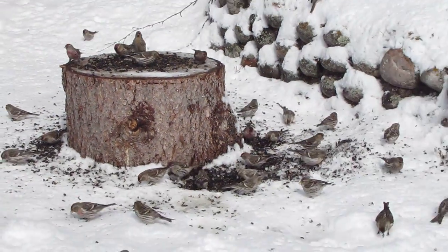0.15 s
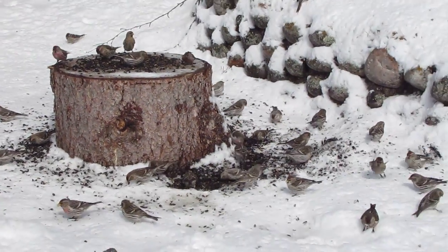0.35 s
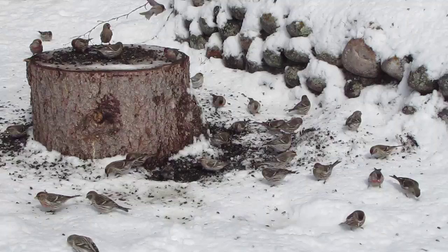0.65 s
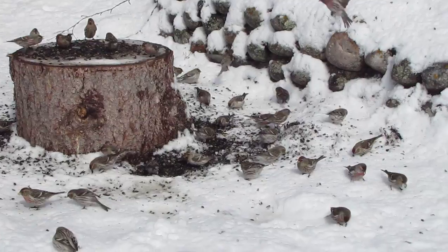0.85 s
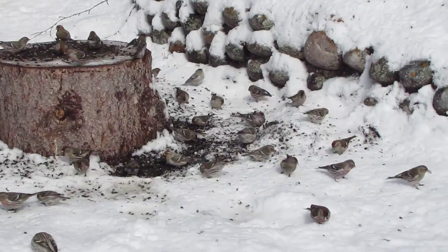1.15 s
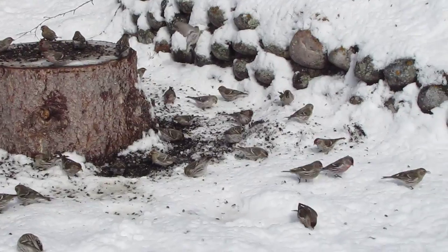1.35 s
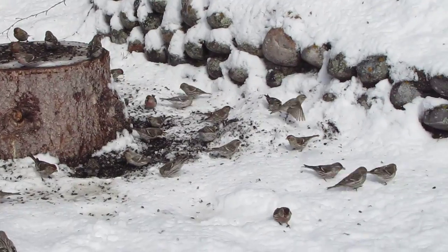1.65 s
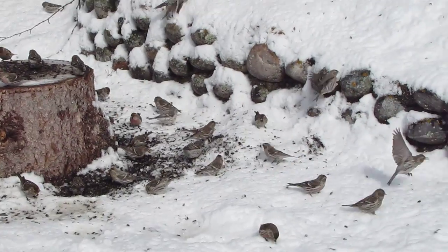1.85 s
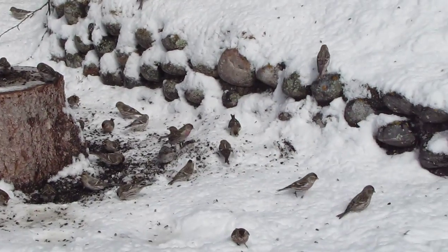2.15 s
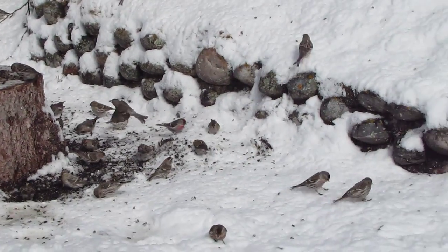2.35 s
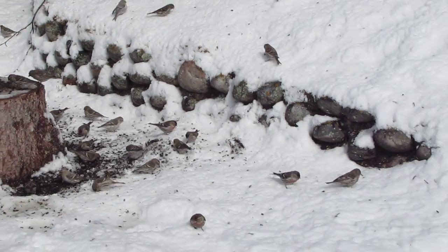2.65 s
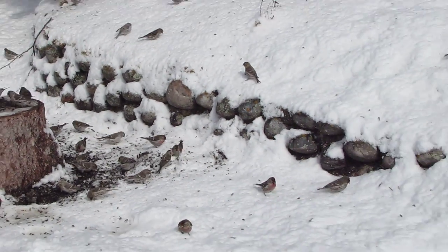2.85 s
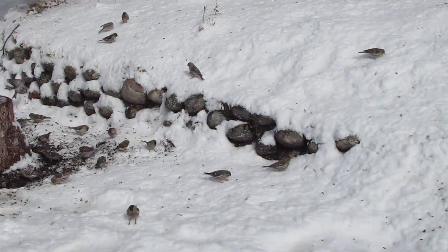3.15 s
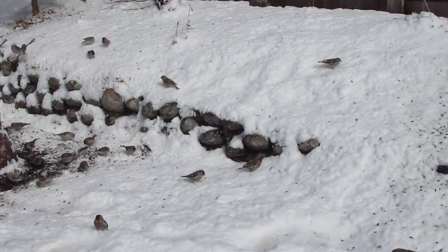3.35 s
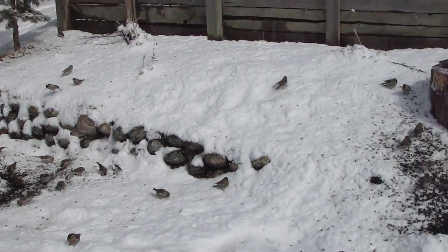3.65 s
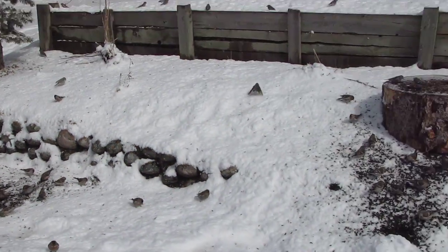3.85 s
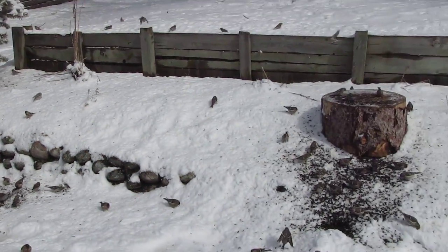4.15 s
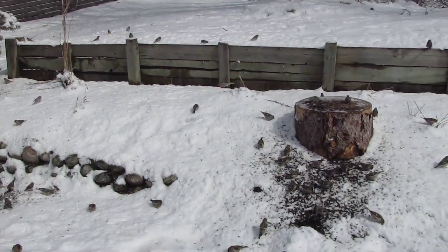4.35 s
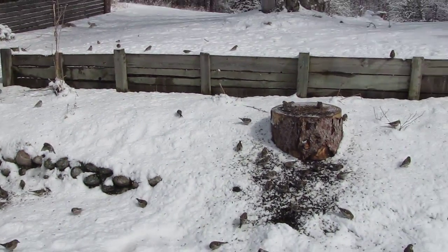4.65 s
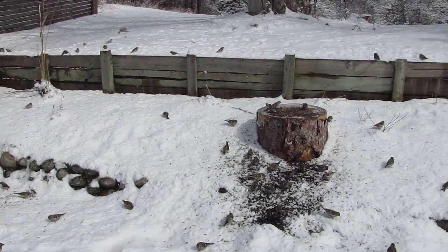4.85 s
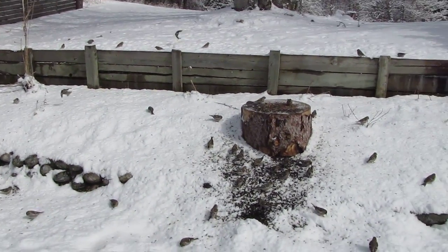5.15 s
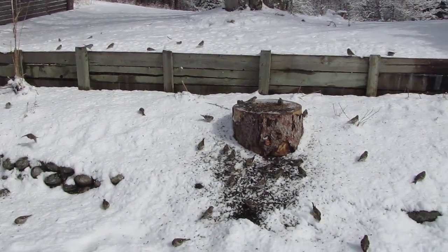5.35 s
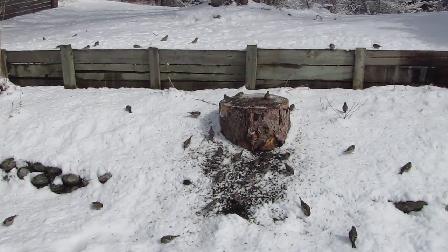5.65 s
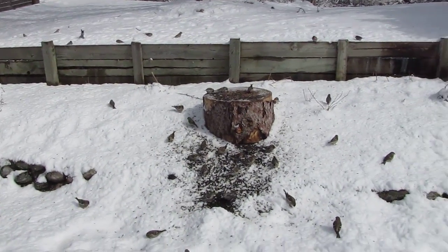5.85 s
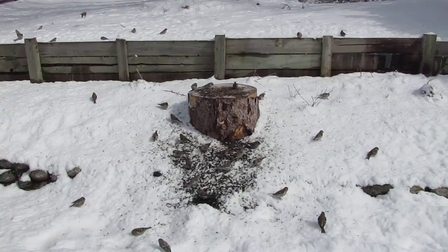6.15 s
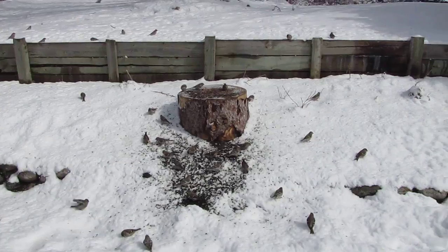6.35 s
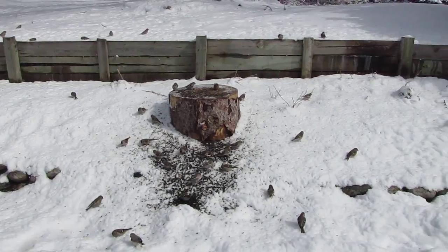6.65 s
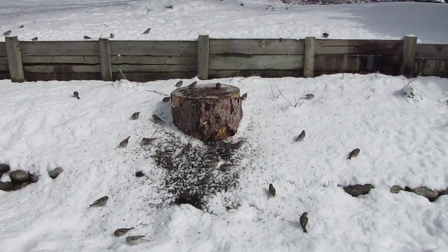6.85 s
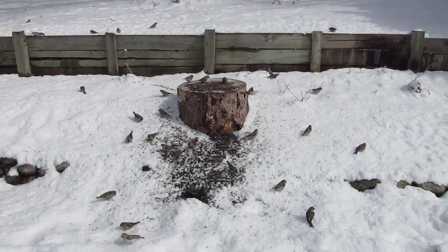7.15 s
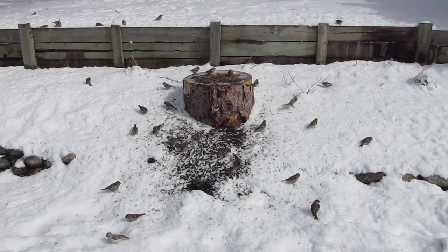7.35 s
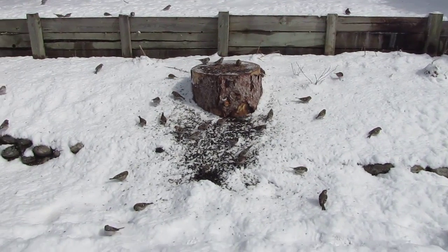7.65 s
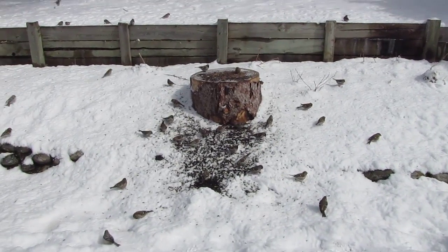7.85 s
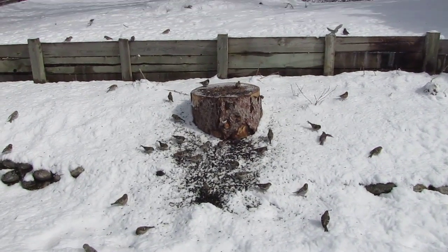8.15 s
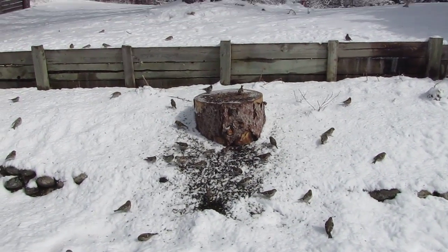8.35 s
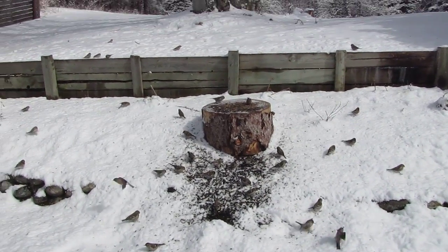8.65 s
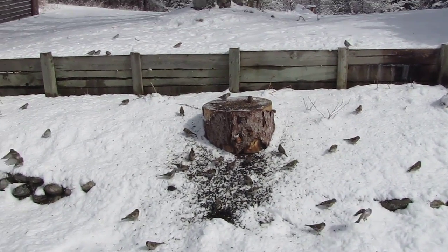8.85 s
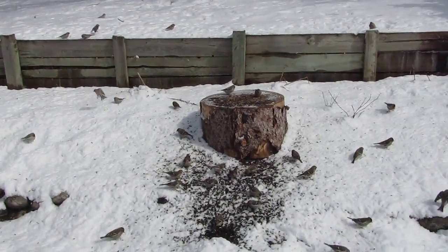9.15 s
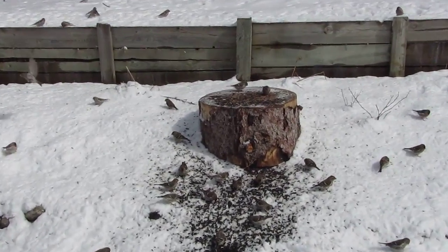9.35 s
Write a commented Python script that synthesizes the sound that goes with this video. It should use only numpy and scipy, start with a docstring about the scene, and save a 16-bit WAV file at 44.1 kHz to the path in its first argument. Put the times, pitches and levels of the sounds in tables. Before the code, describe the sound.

A large flock of small finches twitters without pause in an open yard. Short, high, falling chirps and buzzy rasps from nearby birds stand out over a blur of farther ones, slightly to the left. Fingers now and then tick and bump on the hand-held camera, most strongly around the middle. Distant traffic hums faintly underneath and swells at the very end.

```python
"""Finches feeding in a snowy yard

A flock calls in a fenced yard, heard at the two microphone ports of a hand-held camera. In each chirp
the two voices of the syrinx fall together; some birds rasp. Near birds stand out over a blur of far ones.
Fingers tick and bump on the camera body; distant traffic hums and swells at the end."""
import sys
import numpy as np
from scipy import signal
from scipy.fft import rfft, irfft, next_fast_len
from scipy.io import wavfile
from scipy.ndimage import uniform_filter1d

SR = 44100
rng = np.random.default_rng(int(sys.argv[2]) if len(sys.argv) > 2 else 0)


def store_pcm(level_fs):
    """Save levels as 16-bit WAV."""
    pcm = np.round(np.clip(level_fs, -1, 1) * 32767).astype(np.int16)
    wavfile.write(sys.argv[1], SR, np.atleast_2d(pcm).T)


N = 418052

# spectrum of the steady air and traffic noise: frequency_hz, relative_density_db
AIR_SPECTRUM = [(12, -38), (20, 11.5), (119, -7), (326, -5.5), (1790, -14.5), (2870, -9), (4480, -13),
                (15700, -32.5)]
# bands of the traffic hum: centre_hz, width_hz, relative_level_db
HUM_BANDS = [(65.9, 25, -4), (117.2, 16.7, -5), (168, 262, -3)]
# swell of the distant traffic: time_s, rumble_db, tyre_hiss_db
TRAFFIC_LEVELS = [(0, -45, -65.5), (2.3, -42, -51.5), (4.9, -47, -52), (5.3, -47, -68.5), (8.5, -45, -64.5),
                  (8.9, -43, -44), (9.2, -39, -45), (9.48, -33, -42.5)]
# finger impacts on the camera body: start_s, level_db, pitch_hz
FINGER_KNOCKS = [(0.198, -20.5, 910), (0.32, -25.5, 579), (1.196, -32.5, 684), (1.98, -20, 990),
                 (2.273, -27.5, 690), (2.803, -11.5, 242), (2.986, -11, 218), (3.812, -24, 905),
                 (4.932, -19, 894), (5.073, -23.5, 620), (5.285, -31, 764), (5.502, -7.5, 1046),
                 (5.541, -31.5, 404), (8.434, -34, 198), (8.55, -23, 687), (8.635, -17.5, 713)]
# the flock as the camera turns: time_s, far_birds_db, near_left_minus_right_db
FLOCK_BALANCE = [(0, -31.5, -0.5), (1.3, -40.5, 3.5), (1.7, -39, 6.5), (3.5, -33.5, 3.5), (4.2, -41.5, 6.5),
                 (5.4, -37, 4), (6.5, -35.5, 5), (7.6, -38, 5.5), (8.3, -31, 3.5), (9.48, -42, 2.5)]
# joint response of beak and microphone: frequency_hz, gain_db
BEAK_RESPONSE = [(1500, -14), (2200, -5.5), (3000, 0), (4500, 5.5), (6000, 2), (8000, -5.5), (16000, -7)]
# hoarse near calls, two of them thin and high: start_s, centre_hz, length_s, relative_level_db
NEAR_RASPS = [(0.136, 3680, 0.052, -31), (0.179, 4930, 0.021, -27), (0.225, 3980, 0.048, -31),
              (0.584, 3500, 0.05, -44), (0.711, 4170, 0.04, -39), (0.79, 3590, 0.037, -30.5),
              (0.977, 4290, 0.021, -27), (1.498, 4820, 0.044, -31), (1.61, 4740, 0.032, -27.5),
              (1.731, 4610, 0.022, -24), (1.894, 5500, 0.022, -27), (2.266, 3160, 0.02, -21),
              (2.513, 4730, 0.026, -25), (2.844, 5020, 0.0207, -25.5), (2.96, 5080, 0.056, -31),
              (3.059, 4980, 0.049, -28), (3.16, 5450, 0.057, -26.5), (3.298, 5000, 0.054, -28),
              (3.41, 5430, 0.066, -27), (4.563, 5270, 0.028, -33), (4.968, 4230, 0.018, -34),
              (5.167, 4350, 0.055, -28), (5.498, 3620, 0.03, -26), (5.565, 3890, 0.044, -27.5),
              (5.667, 4760, 0.059, -29.5), (6.499, 4310, 0.063, -25.5), (6.589, 3900, 0.016, -23),
              (6.682, 5770, 0.021, -26), (6.703, 4140, 0.044, -28.5), (6.935, 4190, 0.02, -23),
              (7.151, 4240, 0.066, -25.5), (7.165, 14100, 0.051, -33), (7.287, 4470, 0.042, -25),
              (7.29, 14400, 0.06, -39), (7.524, 4820, 0.052, -33), (7.85, 4970, 0.072, -31.5),
              (7.94, 4160, 0.033, -39), (8.045, 4190, 0.042, -26.5), (8.115, 4600, 0.031, -27.5),
              (8.218, 4580, 0.023, -26), (8.286, 4760, 0.019, -20), (8.356, 4820, 0.053, -24.5),
              (8.795, 4610, 0.024, -24), (8.943, 4380, 0.045, -29.5), (9.149, 3510, 0.023, -28)]
# near chirps: start_s, base_pitch_hz, length_s, bend (1 slide to 5 hook), relative_level_db, overtones_db
NEAR_CHIRPS = [(0.029, 1930, 0.027, 1.26, -38, 2), (0.317, 2790, 0.032, 4.2, -35, -11),
               (0.401, 2140, 0.055, 1.26, -38, -16), (0.439, 2340, 0.027, 1.8, -31.5, -18),
               (0.875, 2180, 0.046, 4.6, -34.5, -7), (0.985, 2290, 0.059, 3.76, -32, -3),
               (1.092, 2227, 0.037, 1.8, -29, -13), (1.131, 2240, 0.032, 2.1, -34.5, -13),
               (1.242, 2115, 0.038, 1.64, -32, -14), (1.346, 2200, 0.032, 4.4, -39, -16),
               (1.389, 2550, 0.024, 2.2, -36, -20), (1.415, 2190, 0.044, 2.4, -33, -29),
               (1.499, 2415, 0.05, 0.87, -30.5, -14), (1.602, 2440, 0.049, 0.75, -34.5, -17),
               (1.796, 2560, 0.056, 2.7, -40.5, 5), (1.894, 2550, 0.055, 3.8, -42.5, 1),
               (2.014, 2600, 0.058, 3.4, -35, -18), (2.145, 2100, 0.047, 2.7, -34, -22),
               (2.251, 2270, 0.024, 2, -28.5, -8.5), (2.343, 2305, 0.055, 2.6, -40.5, 5.5),
               (2.449, 2060, 0.056, 2.1, -33, -9), (2.534, 2140, 0.028, 3, -30.5, -11),
               (2.599, 2070, 0.032, 1.3, -34, -29), (2.648, 2197, 0.037, 2.1, -35, -19),
               (2.728, 2253, 0.025, 3.6, -35, -10), (2.78, 2380, 0.032, 1.7, -45, -20),
               (2.822, 2255, 0.025, 2.7, -33.5, -12), (2.903, 2660, 0.02, 2.6, -33.5, -15),
               (2.926, 2330, 0.047, 5, -34.5, -3.5), (3.013, 2350, 0.031, 1.7, -36, -10),
               (3.28, 2770, 0.064, 2.9, -41.5, 4.5), (3.399, 2005, 0.041, 5.8, -34.5, -5.5),
               (3.514, 2460, 0.041, 4.5, -33, -15), (3.554, 1950, 0.064, 2.8, -36, -5),
               (3.647, 2460, 0.047, 4.7, -33, -5), (3.756, 2096, 0.065, 3.1, -40.5, -2),
               (3.874, 2080, 0.024, 3.4, -39, -1), (3.94, 2020, 0.059, 1.9, -40, -13),
               (4.503, 1950, 0.052, 5.9, -37, -6), (4.583, 2080, 0.037, 2.1, -35.5, -11),
               (4.69, 2160, 0.039, 1.8, -36, -16), (4.765, 1930, 0.04, 3.9, -37, -11),
               (4.853, 1920, 0.042, 3.6, -38.5, -4), (5.062, 2014, 0.065, 3.2, -36, -6),
               (5.169, 2240, 0.034, 3, -36, -20), (5.29, 2215, 0.036, 5.9, -37, -4),
               (5.714, 2014, 0.043, 1.8, -31, -12), (5.804, 2340, 0.072, 2.3, -36, -5),
               (5.869, 2038, 0.032, 5.2, -31.5, -12), (5.943, 1900, 0.045, 2.7, -34.5, 0),
               (6.007, 2240, 0.061, 3.2, -34.5, -3.5), (6.054, 2085, 0.046, 4.6, -30, -5),
               (6.152, 2013, 0.058, 3.2, -30.5, -7), (6.276, 2120, 0.032, 4.3, -34, -6.5),
               (6.415, 2950, 0.032, 6.1, -31.5, -21), (6.466, 2320, 0.026, 1.27, -36, -19),
               (6.498, 2860, 0.058, 4.2, -31, -9), (6.588, 3030, 0.051, 1.8, -37.5, -12),
               (6.609, 2670, 0.057, 1.65, -33.5, -7), (6.631, 2960, 0.025, 5, -32, -12),
               (6.816, 2785, 0.032, 1.9, -32, -32), (6.929, 3040, 0.031, 1, -35, -27),
               (6.965, 2340, 0.028, 1.06, -31, -22), (7.055, 2080, 0.047, 0.89, -34, -8),
               (7.181, 1940, 0.049, 1.1, -30, -2), (7.313, 1900, 0.052, 1.1, -29, -9),
               (8.142, 2340, 0.027, 5, -39.5, 8.5), (8.182, 2210, 0.036, 1.1, -34, -12),
               (8.242, 2210, 0.042, 3, -31.5, -0.5), (8.27, 2186, 0.032, 1, -35, -4),
               (8.362, 2960, 0.03, 5.3, -29, -2), (8.604, 2260, 0.075, 1.8, -39.5, -4),
               (8.735, 1920, 0.036, 1.44, -33.5, -11), (8.813, 2270, 0.024, 4.3, -36.5, -6),
               (8.914, 2270, 0.043, 3.3, -36, -5), (9.139, 2210, 0.03, 4.5, -32, -14),
               (9.161, 2410, 0.025, 1.1, -32, -21)]

VOICE_RATIO, FALL, UPTURN = 1.3, .9, .07  # upper over lower voice; glide depths relative to base pitch
FAR_CHIRPS_PER_S, CUTOFF_HZ = 90, 15750


def undb(db):
    """Amplitude ratio of a level in decibels."""
    return 10 ** (np.asarray(db) / 20)


def at_level(x, db):
    """Scale a signal to an rms level."""
    return x * undb(db) / np.sqrt(np.mean(x ** 2))


def curves(table):
    """Interpolate the columns of a time table linearly at every sample."""
    time_s, *columns = np.transpose(table)
    return [np.interp(np.arange(N) / SR, time_s, column) for column in columns]


def shape(x, gain):
    """Zero-phase filter: multiply the spectrum by a gain that is a function of frequency."""
    size = next_fast_len(N)
    hz = np.maximum(np.arange(size // 2 + 1) * SR / size, 1)
    return irfft(rfft(x, size) * gain(hz), size)[..., :N]


def colour(x, response):
    """Filter by (frequency_hz, gain_db) points joined on a logarithmic frequency axis."""
    hz, db = np.transpose(response)
    return shape(x, lambda f: undb(np.interp(np.log(f), np.log(hz), db)))


def wobble(count, span):
    """Random fluctuation of unit rms: white noise averaged over span samples."""
    return at_level(uniform_filter1d(rng.standard_normal(count), size=span), 0)


def port_noise(correlation):
    """Partly coherent noise at the two ports: a common part plus an opposed part."""
    mid, side = rng.standard_normal((2, N))
    return np.sqrt(1 + correlation) * mid + np.sqrt(1 - correlation) * side * np.array([[1], [-1]])


def place(out, x, start_s, pan_db, lag_s):
    """Level and time differences give direction: the left port is louder by pan_db, later by lag_s."""
    for port, sign in enumerate((1, -1)):
        i = max(int((start_s + sign * lag_s / 2) * SR), 0)
        out[port, i:i + len(x)] += (x * undb(sign * pan_db / 2))[:max(N - i, 0)]


def background():
    """Band-limited noise: traffic hum wavers in low bands, tyres hiss higher, air noise lies under both."""
    def hum_gain(f):
        return sum(undb(db) / np.sqrt(width) / (1 + ((f - hz) * 2 / width) ** 2)
                   for hz, width, db in HUM_BANDS)

    rumble_db, tyre_db = curves(TRAFFIC_LEVELS)
    rumble = shape(port_noise(0.98), hum_gain)
    tyres = shape(port_noise(0.75), lambda f: 1 / (1 + ((f - 760) / 150) ** 2))
    air = colour(port_noise(0.75), AIR_SPECTRUM)
    return at_level(rumble, rumble_db) + at_level(tyres, tyre_db) + at_level(air, -44.5)


def finger_knocks():
    """Impact drives a pulse, a damped ring and a crack; the shell carries them late to the left port."""
    out, t = np.zeros((2, N)), np.arange(SR // 16) / SR
    # a finger stays in contact for some milliseconds
    contact = np.exp(-((t - .004) / np.where(t < .004, .0012, .0025)) ** 2)
    for start_s, db, hz in FINGER_KNOCKS:
        phase = 2 * np.pi * hz * t
        blow = contact * (np.sin(phase) + .5 * np.sin(1.91 * phase + 1))
        ring = .35 * np.exp(-t / .008) * np.sin(1.1 * phase) * (1 + wobble(len(t), span=60))
        crack = 0.15 * (hz / 1000) * np.exp(-t / 0.0041) * wobble(len(t), span=12)
        knock = undb(db) * (blow + ring + crack)
        place(out, knock, start_s, pan_db=-1.0, lag_s=0.00031 * min(hz / 900, 1))
    return out


def yard_echoes(x, t60_s, wet_db):
    """Scattering from fence, trees and house: a diffuse exponential decay, different at each port."""
    t = np.arange(SR // 2) / SR
    response = rng.standard_normal((2, len(t))) * np.exp(-np.log(1000) * t / t60_s)
    response *= undb(wet_db) / np.sqrt(np.sum(response ** 2, axis=1, keepdims=True))
    return signal.fftconvolve(x.mean(axis=0, keepdims=True), response, axes=1)[:, :N]


def rasp(centre_hz, length_s):
    """Rapid random modulation of pitch and amplitude broadens a sagging voice into a buzz."""
    count = int(length_s * SR)
    progress = np.arange(count) / (length_s * SR)
    hz = centre_hz * (1 + 0.1203 * (.5 - progress) + 0.094 * wobble(count, span=30))
    phase = 2 * np.pi * np.cumsum(hz) / SR
    voice = np.sin(phase) + 0.2 * np.sin(.62 * phase) + 0.2 * np.sin(2.5 * phase)
    flutter = 1 + 0.41 * wobble(count, span=40)
    return voice * flutter * np.sin(np.pi * progress) ** 0.77


def chirp(base_hz, length_s, bend, overtones_db, roughness, third_order_db=-16, breath_db=-6):
    """Nonlinear mixing of two falling syrinx voices yields harmonics and sum tones."""
    count = int(length_s * SR)
    progress = np.arange(count) / (length_s * SR)
    # turbulent air makes the membranes flutter in amplitude and pitch, most as they start and stop
    unrest = roughness * (1 + 2.5 * (2 * progress - 1) ** 4)
    # with a large bend the pitch falls fast, flattens and turns up
    glide = 1 + FALL * (1 - progress) ** bend + UPTURN * (bend - 1) * progress ** 5
    hz = base_hz * glide * (1 + 0.02516 * wobble(count, span=300))
    # phases of the lower and upper voice
    low = 2 * np.pi * (np.cumsum(hz) / SR + rng.random()) + .45 * unrest * wobble(count, span=20)
    high = VOICE_RATIO * (1 + 0.02027 * rng.standard_normal()) * low + 2 * np.pi * rng.random()
    second_order = np.sin(2 * low) + 1.05 * np.sin(low + high) + np.sin(2 * high)
    third_order = np.sin(3 * low) + np.sin(2 * low + high) + np.sin(low + 2 * high) + np.sin(3 * high)
    third_order *= np.clip(5 - hz / 1e3, 0, 1)  # fades out for pitches from 4 to 5 kHz
    breath = undb(breath_db) * rng.standard_normal(count)
    effort = np.sin(np.pi * progress ** 0.95) ** 0.64
    balance = 0.38 * wobble(count, span=400)  # the two voices take turns
    voices = (1 + balance) * np.sin(low) + (1 - balance) * np.sin(high)
    overtones = undb(overtones_db) * effort * (second_order + undb(third_order_db) * (third_order + breath))
    flutter = 1 + 0.65 * unrest * wobble(count, span=20)
    return (voices + overtones) * flutter * effort


def near_birds(turn_db):
    """Direct sound outweighs the echoes, so close chirps and rasps stay distinct."""
    out = np.zeros((2, N))
    calls = []
    for start_s, hz, length_s, bend, db, overtones_db in NEAR_CHIRPS:
        call = chirp(hz, length_s, bend, overtones_db, roughness=0.11 + 0.6 * rng.random())
        calls.append((start_s, undb(db + 3.5) * call))
    calls += [(start_s, undb(db) * rasp(hz, length_s)) for start_s, hz, length_s, db in NEAR_RASPS]
    for start_s, call in calls:
        pan_db = turn_db[int(start_s * SR)] + 7 * (rng.random() - .5)
        # a bird on the left reaches the left port first
        place(out, call, start_s, pan_db, lag_s=-2.5e-5 * pan_db)
    return out + yard_echoes(out, t60_s=0.21, wet_db=-8)


def far_birds(level_db):
    """Incoherent superposition: many chirps from all sides overlap and blur in the reverberation."""
    out = np.zeros((2, N))
    for when, pitch, length, bend, loudness, side in rng.random((int(FAR_CHIRPS_PER_S * N / SR), 6)):
        call = chirp(1950 * (1 + .5 * pitch), .024 + .03 * length, 1 + 4 * bend,
                     overtones_db=-7, roughness=0.37)
        place(out, undb(8 * loudness) * call, when * N / SR,
              pan_db=3 + 12 * (side - .5), lag_s=3e-4 * (.3 - side))
    return at_level(out + yard_echoes(out, t60_s=0.25, wet_db=-4.7), level_db)


def flock():
    """Source and filter: the response of beak and microphone colours every call."""
    far_db, turn_db = curves(FLOCK_BALANCE)
    return colour(near_birds(turn_db) + far_birds(far_db), BEAK_RESPONSE)


def scene():
    """Linear superposition of birds, knocks and background at the two ports."""
    return flock() + finger_knocks() + background()


def record(dry):
    """Band limiting: the camera's steep low-pass filter removes the highest treble."""
    return signal.sosfilt(signal.ellip(12, .2, 80, CUTOFF_HZ, fs=SR, output="sos"), dry)


dry = scene()
out = record(dry)
store_pcm(out)
```